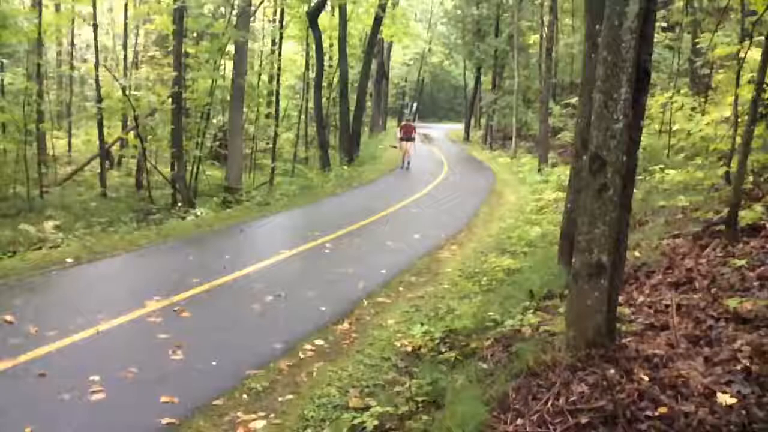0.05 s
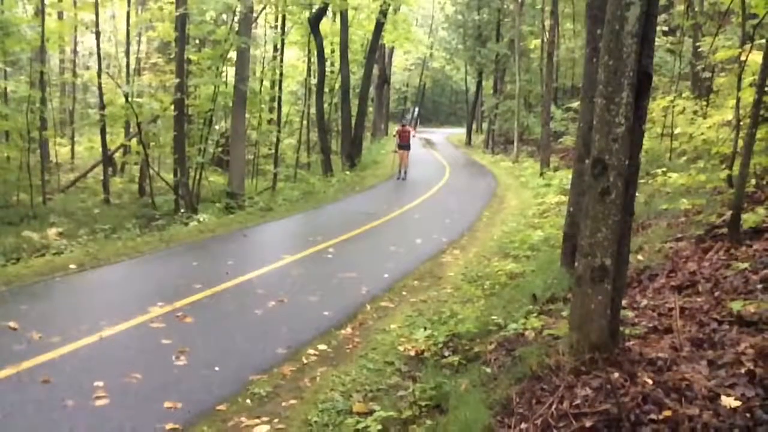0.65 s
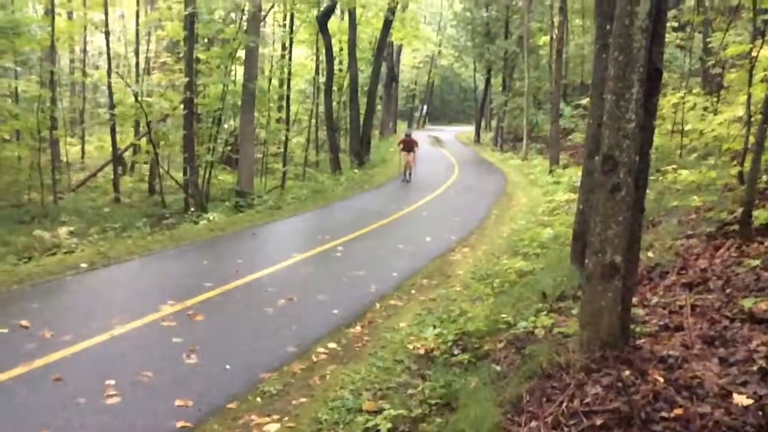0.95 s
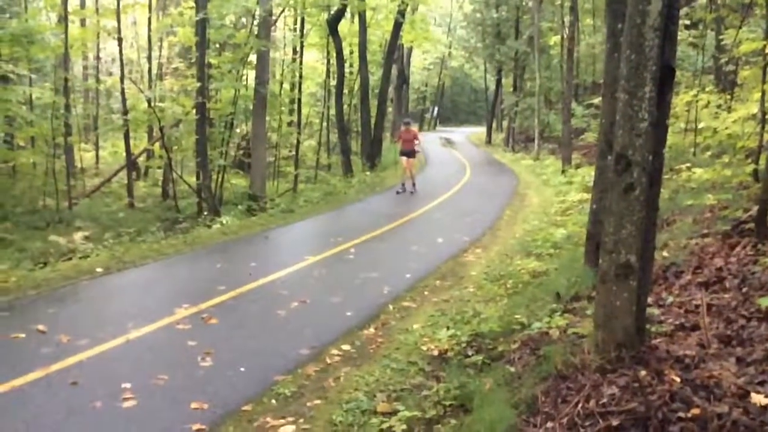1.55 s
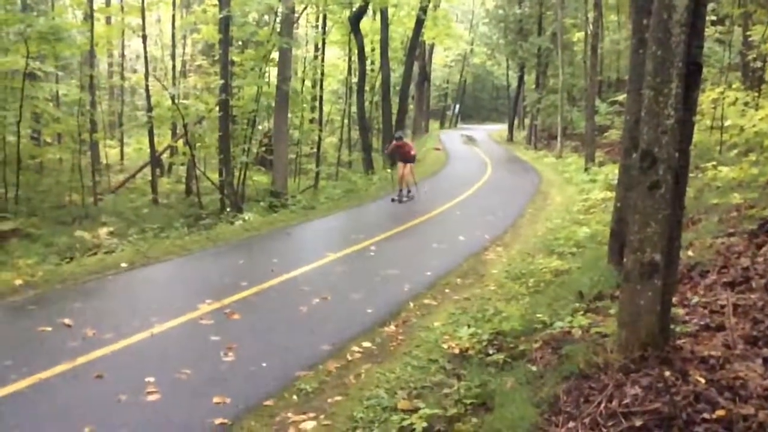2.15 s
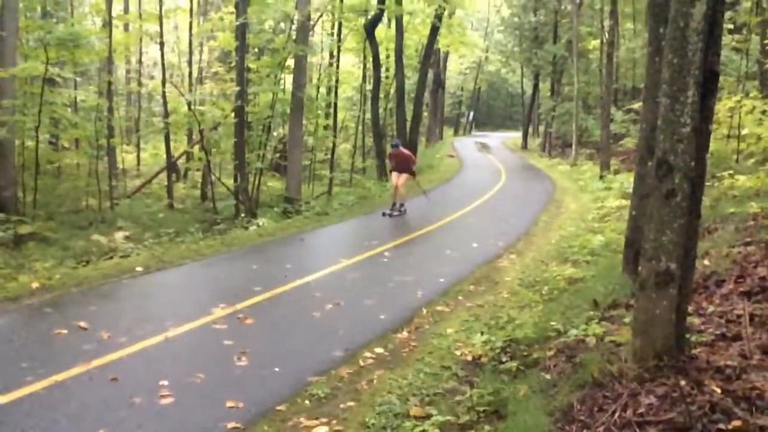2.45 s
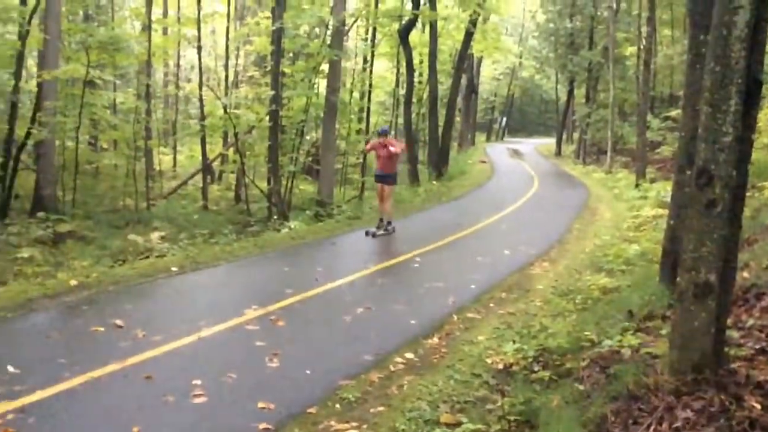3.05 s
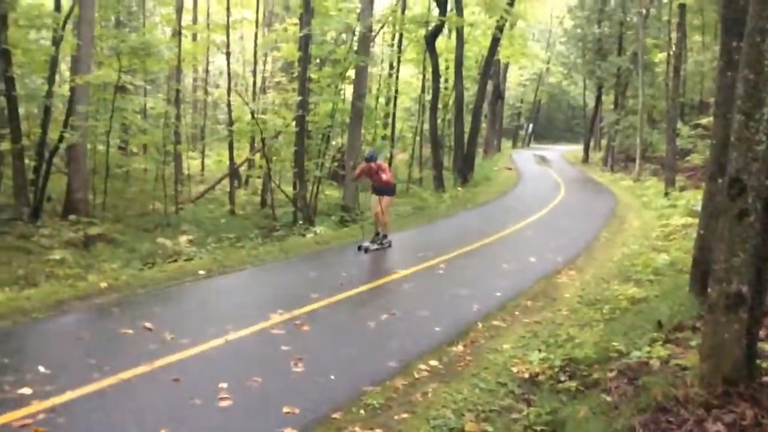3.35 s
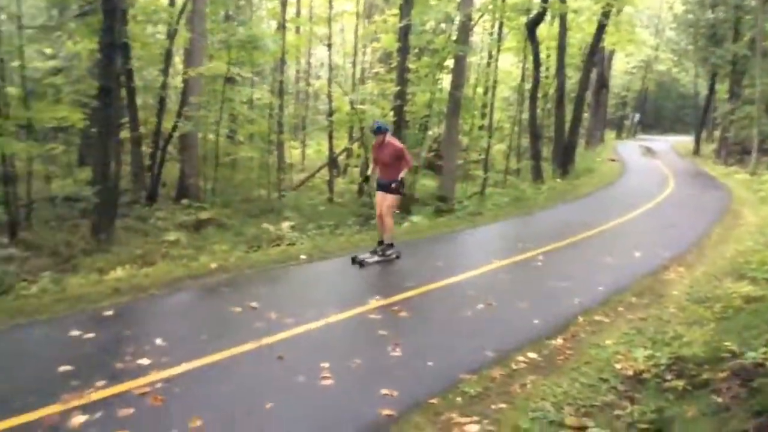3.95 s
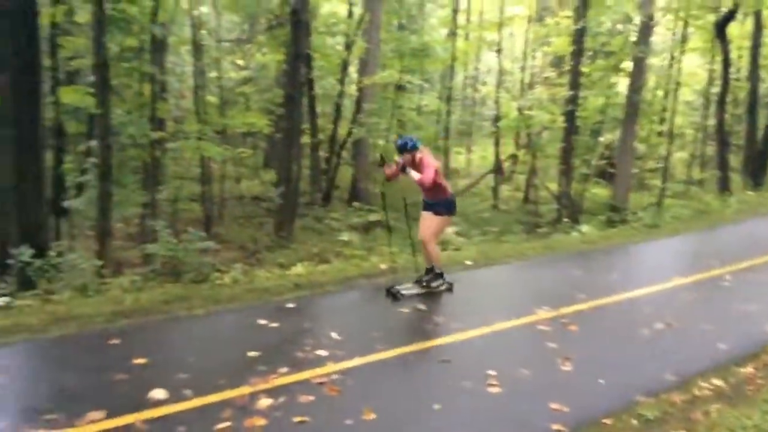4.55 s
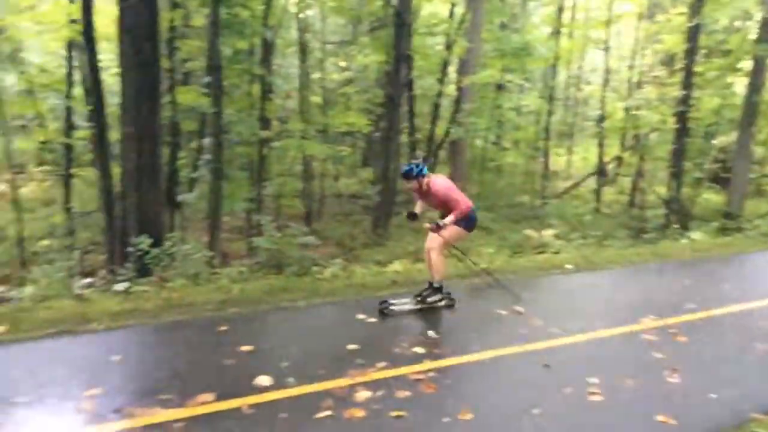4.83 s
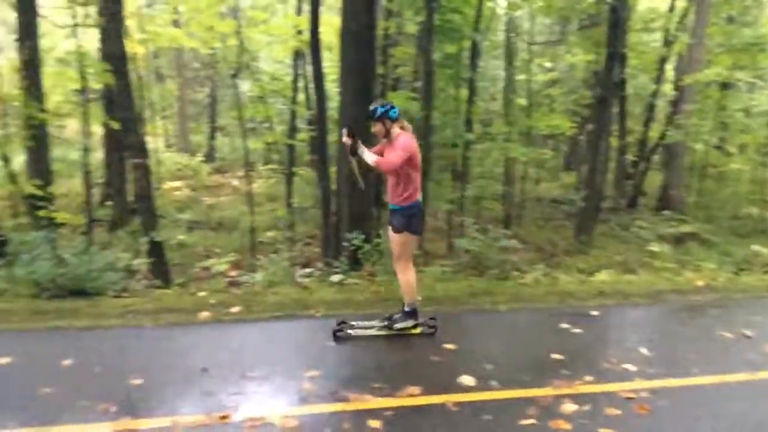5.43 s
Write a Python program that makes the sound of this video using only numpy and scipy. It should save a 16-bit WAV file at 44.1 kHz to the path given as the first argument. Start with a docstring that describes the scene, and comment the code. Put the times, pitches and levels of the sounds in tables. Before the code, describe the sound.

A faint low rumble and light, even hiss of woods run throughout. At about 0.7 seconds a dull knock right at the microphone is the loudest sound. A roller skier's pole tips then hit the asphalt at about 0.8, 2.1, 3.4 and 4.6 seconds. Both tips land almost together, making a sharp, bright click with a slight ring and a short echo off the trees. The last two are louder, the final one brightest. After each click the wheels swell for about half a second, a soft gritty whirr with a high fizz of wet spray. The rolling grows gradually as the skier approaches, passing closest around 5.2 seconds. Light, hard ski clacks come faintly near 1.3 and 1.7 seconds, then more clearly between 3.6 and 5.1. Softer microphone knocks fall at about 1.6 and 4.0 seconds, with a few small ones until 4.4.

```python
"""Roller skier on a wet forest path

A skier double-poles toward and past the listener. Hard pole tips bite the asphalt in pairs,
ringing the shafts, and the trunks scatter each click. The wheels roll, clack and throw a fine spray.
A few soft knocks sound right at the microphone, over a faint rumble and hiss."""
import sys
import numpy as np
from scipy import signal
from scipy.fft import rfft, irfft, next_fast_len
from scipy.io import wavfile
from scipy.ndimage import uniform_filter1d

SR = 44100
rng = np.random.default_rng(int(sys.argv[2]) if len(sys.argv) > 2 else 0)


def to_wav(s):
    """Save 16-bit WAV."""
    ch = np.atleast_2d(s).T  # columns
    pcm = np.round(np.clip(ch, -1, 1) * 32767)  # PCM
    wavfile.write(sys.argv[1], SR, pcm.astype(np.int16))


N = 246519

# pole plants: start_s, crack_db, ping_db, skid_db, skid_s, treble_tilt_db_per_octave, ring_db, echo_db
POLE_PLANTS = [(0.824, -31, -31, -43.5, 0.0016, -3, -13, -19), (0.826, -31, -43, -46, 0.002, 1, -19, -18.5),
               (2.1261, -29, -51, -38.5, 0.0039, -4, -36, -15),
               (2.1283, -37, -52, -44, 0.0016, -2, -34, -22),
               (3.3615, -26.5, -45, -37.5, 0.0055, -3, -15, -15),
               (3.372, -21.5, -42, -41, 0.0054, -2, -19, -16), (4.637, -32, -40, -31, 0.0051, -1, -16, -18),
               (4.6464, -26, -10, -26.5, .006, 1, -6.5, -15)]
def poles(echo_ring_db=-12, low_cut_hz=380):
    """Left and right tips land milliseconds apart on each stroke; the thin poles radiate little bass."""
    out = np.zeros(N)
    for start_s, *strike, ring_db, echo_db in POLE_PLANTS:
        add(out, start_s, tip_strike(*strike, ring_db))
        add(out, start_s, undb(echo_db) * forest_echo(ring_db + echo_ring_db))
    return signal.sosfilt(signal.butter(1, low_cut_hz, "high", fs=SR, output="sos"), out)


# tone of a hard tip on asphalt: freq_hz, level_db
TIP_SPECTRUM = [(100, -11), (400, -4), (650, 2.5), (900, -6.5), (1300, 0.5), (2100, 2), (2900, -1),
                (3900, 1.5), (4600, -7), (7500, -8), (10500, -7), (13300, 0.5), (15500, -2.5)]
def tip_strike(crack_db, ping_db, skid_db, skid_s, tilt_db, ring_db, size=8192):
    """The tip pings on the asphalt and skids until it bites; crack and skid ring the shaft."""
    ping_hz, ping_s, crack_decay_s, skid_decay_s = 13100, .00009, .0012, .0035
    t = np.arange(size) / SR
    ping = (t / ping_s / 2) ** 2 * np.exp(2 - t / ping_s) * np.sin(2 * np.pi * ping_hz * t)
    crack = rng.standard_normal(size) * np.exp(-t / crack_decay_s)
    crack[0] += undb(12)  # the clean first blow that sets the shaft ringing
    skid = grains(14000, 1.2)[:size] * np.exp(-np.maximum(t - skid_s, 0) / skid_decay_s)
    crack, skid = (colour(shaft(x, ring_db), TIP_SPECTRUM, tilt_db=tilt_db) for x in (crack, skid))
    crack /= np.abs(crack).max()
    skid /= np.std(skid[:int(skid_s * SR) + 2])
    return undb(ping_db) * ping + undb(crack_db) * crack + undb(skid_db) * skid


# ring of the pole shaft: pitch_hz, level_db, t60_s
SHAFT_MODES = [(1470, -26.5, 0.043), (1970, -24.5, 0.039), (2410, -30, 0.036), (3828, -16, 0.025),
               (5800, -24, .018), (8470, -23.5, 0.023), (12840, -22, .008)]
def shaft(contact, ring_db):
    """The contact sounds directly and also rings the hollow pole."""
    t = np.arange(SR // 10) / SR
    ring = sum(undb(db - 60 * t / t60) * np.cos(2 * np.pi * hz * t) for hz, db, t60 in SHAFT_MODES)
    return contact + signal.fftconvolve(contact, undb(ring_db) * ring)[:len(contact)]


# tone of the echo off the trunks: freq_hz, level_db
TRUNK_SPECTRUM = [(200, -24), (1000, -15), (2200, 2), (3000, 2.5), (3900, 4.5), (5500, 0.5), (8000, -5.5),
                  (14000, -6)]
def forest_echo(ring_db, near_t60_s=0.38, far_t60_s=0.95, far_db=-15, build_s=0.0016, size=32768):
    """The ringing click is scattered by near trunks, then faintly by the deeper wood."""
    t = np.arange(size) / SR
    decay = undb(-60 * t / near_t60_s) + undb(far_db - 60 * t / far_t60_s)
    scatter = rng.standard_normal(size) * decay * (1 - np.exp(-t / build_s))
    echo = colour(shaft(scatter, ring_db), TRUNK_SPECTRUM)
    return echo / np.sqrt(np.sum(echo ** 2))


# pushes on the poles: start_s, attack_s, length_s, roll_rise_db, spray_rise_db
POLE_PUSHES = [(.83, 0.28, 0.49, 6.5, 6.5), (2.13, 0.19, 0.47, 4.5, 7), (3.356, 0.18, 0.43, 5.5, 5.5),
               (4.63, 0.2, 0.44, 6.5, 4)]
# stretches of rough asphalt: centre_s, half_width_s, level_db
ROUGH_ASPHALT = [(1.292, 0.16, -54), (4.353, 0.35, -55.5)]
def wheels(speed_m_s=5.64, passes_s=5.225, closest_m=4.69):
    """The wheels grow with nearness and swell on each push and over rough asphalt."""
    along_m = speed_m_s * (np.arange(N) / SR - passes_s)
    # inverse distance; each layer takes a share, the hiss least, so it carries furthest
    distance_db = 20 * np.log10(closest_m / np.hypot(along_m, closest_m))
    load_db = sum(roll_db * effort(*timing) for *timing, roll_db, _ in POLE_PUSHES)
    wet_db = sum(spray_db * effort(*timing) for *timing, _, spray_db in POLE_PUSHES)
    rough = sum(undb(db) * swell(centre_s, width_s) for centre_s, width_s, db in ROUGH_ASPHALT)
    return (roll(distance_db, load_db) + tread(distance_db, wet_db, rough)
            + spray(distance_db, wet_db) + drone(distance_db, load_db, rough))


def effort(start_s, attack_s, length_s, release_s=0.22, recovery_s=0.95):
    """One stroke's drive builds, holds, lets go, and returns a little as the skier straightens up."""
    t = np.arange(N) / SR - start_s
    push = np.clip(t / attack_s, 0, 1) * np.clip(1 - (t - length_s) / release_s, 0, 1)
    return push + 0.21 * swell(start_s + recovery_s, half_width_s=0.25)


# midrange whirr of the wheels: freq_hz, level_db
ROLL_SPECTRUM = [(200, -10), (650, -12), (830, -13), (980, -2), (1250, -3), (1480, -2.5), (2200, -2),
                 (2600, -10), (3200, -12), (8000, -38)]
def roll(distance_db, load_db):
    """Asphalt grit drums the wheels, harder under load."""
    whirr = unit(colour(grains(9000, 0.7), ROLL_SPECTRUM)) * undb(0.87 * wander(35))
    return whirr * undb(-53 + 0.94 * distance_db + load_db)


# sizzle of the wet tread: freq_hz, level_db
TREAD_SPECTRUM = [(1500, -23.5), (2600, 0.5), (3300, -5), (4100, 3), (4600, -6), (5200, -4.5), (6200, -2.5),
                  (7400, -10.5), (8600, -5.5), (15000, -18.5)]
def tread(distance_db, wet_db, rough, grit_db=-10):
    """The tread peels off the wet surface and scrapes on the rough stretches."""
    sizzle = unit(colour(grains(12000, 2.45), TREAD_SPECTRUM)) * undb(0.29 * wander(29.66))
    return sizzle * np.hypot(undb(-56 + 0.66 * distance_db + 0.67 * wet_db), undb(grit_db) * rough)


# airy fizz of the droplets: freq_hz, level_db
SPRAY_SPECTRUM = [(5000, -10), (8000, -11), (9800, -10.5), (10500, -1.5), (11500, -1.5), (12700, 2),
                  (14200, 0.5), (15300, -15)]
def spray(distance_db, wet_db):
    """The wheels fling fine droplets, louder on each push."""
    fizz = unit(colour(grains(25000, 3.3), SPRAY_SPECTRUM)) * undb(0.5 * wander(25.2))
    return fizz * undb(-56 + 0.23 * distance_db + wet_db)


# peaks of the rolling drone: pitch_hz, width_hz, level_db
DRONE_PEAKS = [(310, 200, -3.5), (670, 126, -2), (1040, 148, -0.5), (2067, 320, -9)]
def drone(distance_db, load_db, rough):
    """A gritty midrange drone, loudest on rough stretches."""
    peaks = sum(undb(db) * resonate(grains(6000, 0.67), hz, width) for hz, width, db in DRONE_PEAKS)
    return unit(peaks) * np.hypot(undb(-58.5 + 0.99 * distance_db + 0.49 * load_db), rough)


# ski clacks: start_s, peak_db, pitch_hz
CLACK_HITS = [(1.274, -39, 3800), (1.748, -41.5, 4300), (1.841, -48, 1680), (3.6128, -28.5, 1780),
              (3.8302, -29, 1700), (3.8335, -38, 1660), (4.2595, -36, 1010), (4.2785, -32, 714),
              (4.769, -31.5, 2410), (5.091, -33.5, 4380)]
# tone of a clack: pitch_ratio, level_db
CLACK_SPECTRUM = [(.2, -17), (.7, -25), (.85, 8.5), (1.12, 0.5), (1.35, -8), (2.4, -12.5), (4, -30)]
def clacks():
    """Skis, bindings and grit under the wheels give short, hard clacks."""
    return blows(CLACK_HITS, CLACK_SPECTRUM, tail_db=-33, tail_t60_s=0.1)


# close knocks: start_s, peak_db, pitch_hz
KNOCK_HITS = [(.6535, -18.5, 570), (.6548, -8, 349), (.698, -28, 185), (.7605, -36, 212), (.829, -40, 146),
              (1.6325, -24, 354), (2.567, -42, 131), (3.571, -40, 150), (4.0268, -19.5, 528),
              (4.249, -32.5, 694), (4.2645, -27.5, 670), (4.2705, -30, 526), (4.4415, -34, 378)]
# tone of a knock: pitch_ratio, level_db
KNOCK_SPECTRUM = [(.1, -66), (.3, -3.5), (.55, 6), (1.6, 2.5), (2.05, -20), (3, -20.5), (5.5, -29.5),
                  (9, -55), (40, -57)]
def knocks():
    """Soft, dull knocks sound right at the microphone."""
    return blows(KNOCK_HITS, KNOCK_SPECTRUM, tail_db=-41, tail_t60_s=0.094)


def blows(hits, spectrum, tail_db, tail_t60_s, size=4096):
    """Heavily damped blows of a cycle or two, each with a faint short rattle."""
    out, t = np.zeros(N), np.arange(size) / SR
    for start_s, peak_db, pitch_hz in hits:
        force = rng.standard_normal(size) * undb(tail_db - 60 * t / tail_t60_s)
        force[0] += 1  # the impact ahead of the rattle
        blow = colour(force, spectrum, scale=pitch_hz)
        add(out, start_s, undb(peak_db) * blow / np.abs(blow).max())
    return out


# forest ambience: freq_hz, level_db
WOODS_SPECTRUM = [(20, -34), (40, -10.5), (60, 0.5), (130, 0), (220, -3), (380, -14.5), (680, -9.5),
                  (830, -19), (1030, -22), (2200, -20.5), (4100, -27), (5000, -36.5), (9000, -34),
                  (13000, -21)]
def woods(level_db=-53.5):
    """A bed of distant low rumble and light, even hiss."""
    return unit(colour(rng.standard_normal(N), WOODS_SPECTRUM)) * undb(level_db + 0.5 * wander(6.68))


def grains(per_s, spread_db):
    """Dense tiny impacts, a few much larger than the rest."""
    hit = rng.random(N) < per_s / SR
    strength = undb(spread_db * np.minimum(rng.exponential(size=N), 6))
    return unit(hit * strength * rng.standard_normal(N))


def wander(rate_hz):
    """Slow random drift at rms 1: held steps, smoothed twice."""
    hold = int(SR / rate_hz)
    steps = np.repeat(rng.standard_normal(N // hold + 1), hold)
    return unit(uniform_filter1d(uniform_filter1d(steps, hold), hold)[:N])


def resonate(x, hz, width_hz):
    """A resonance with steep skirts: a narrow band-pass after a wider one."""
    wide = signal.lfilter(*signal.iirpeak(hz, hz / width_hz / 2, SR), x)
    return signal.lfilter(*signal.iirpeak(hz, hz / width_hz, SR), wide)


def colour(x, spectrum, scale=1, tilt_db=0):
    """Causal EQ curve, shifted in pitch by scale and tilted per octave in the treble."""
    size = 2 * next_fast_len(len(x) // 2 + 2048)
    hz, db = np.transpose(spectrum)
    bin_octaves = np.log2(np.maximum(np.arange(size // 2 + 1) * SR / size, 1))
    treble_octaves = np.maximum(np.log2(hz / 1500), 0)
    curve_db = np.interp(bin_octaves, np.log2(hz * scale), db + tilt_db * treble_octaves)
    cepstrum = irfft(np.log(undb(curve_db)))
    cepstrum[1:size // 2] *= 2  # fold to minimum phase, so nothing rings ahead of a hit
    cepstrum[size // 2 + 1:] = 0
    return irfft(rfft(x, size) * np.exp(rfft(cepstrum)))[:len(x)]


def swell(centre_s, half_width_s):
    """A smooth rise and fall."""
    return np.exp(-((np.arange(N) / SR - centre_s) / half_width_s) ** 2)


def add(out, start_s, x):
    """Mix x into out at start_s."""
    i = int(start_s * SR)
    out[i:i + len(x)] += x[:len(out) - i]


def undb(db):
    """Decibels to gain."""
    return 10 ** (np.asarray(db) / 20)


def unit(x):
    """Scale to rms 1."""
    return x / np.sqrt(np.mean(x ** 2))


def scene():
    """Skier, close knocks and woods, in mono."""
    return (poles() + wheels() + knocks() + clacks() + woods())[None]


def record(dry, opens_s=0.117, fade_s=0.004, top_hz=15200):
    """The microphone opens after a moment and cuts the highest treble."""
    fade_in = np.clip((np.arange(N) / SR - opens_s) / fade_s, 0, 1)
    return signal.sosfilt(signal.ellip(10, .2, 70, top_hz, fs=SR, output="sos"), dry * fade_in)


dry = scene()
out = record(dry)
to_wav(out)
```